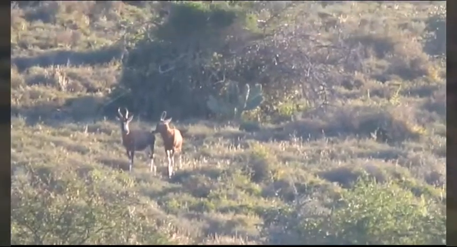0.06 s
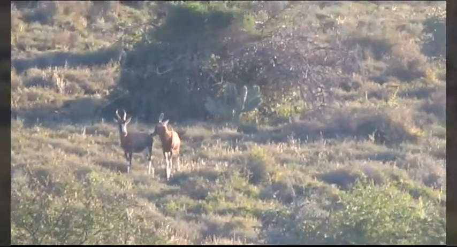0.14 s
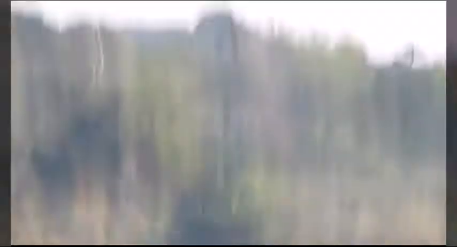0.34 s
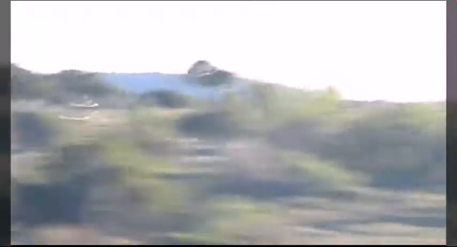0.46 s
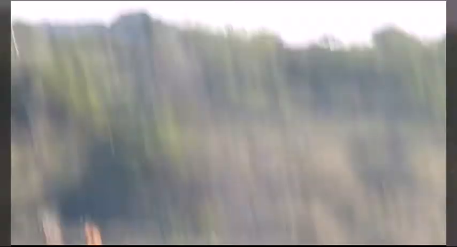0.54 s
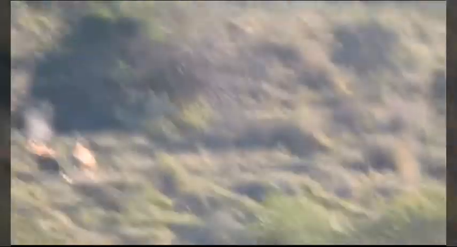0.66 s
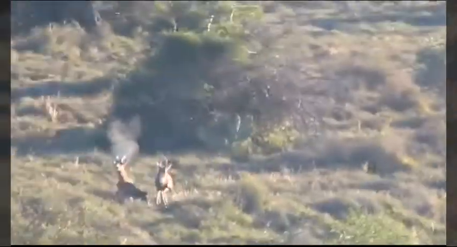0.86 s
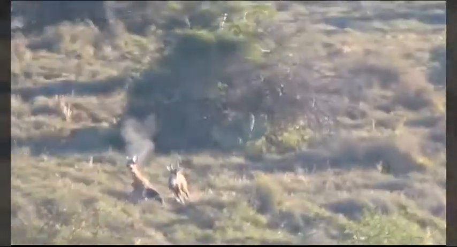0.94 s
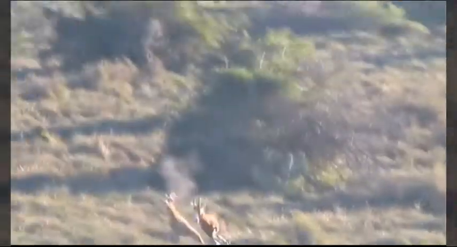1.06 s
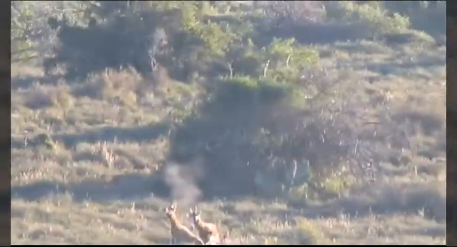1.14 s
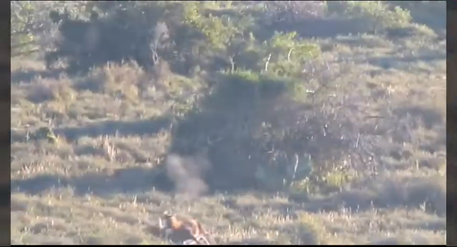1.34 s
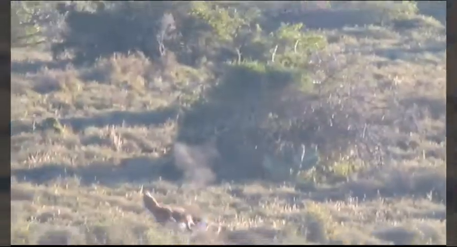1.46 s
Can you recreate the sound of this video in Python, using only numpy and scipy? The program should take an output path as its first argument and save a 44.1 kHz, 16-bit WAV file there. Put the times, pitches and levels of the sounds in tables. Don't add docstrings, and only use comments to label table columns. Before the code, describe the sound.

A close rifle shot cracks and rolls across open scrub, then a distant bullet thud lands

```python
import sys
import numpy as np
from scipy import signal
from scipy.fft import rfft, irfft, next_fast_len
from scipy.io import wavfile
from scipy.ndimage import uniform_filter1d, map_coordinates

SR = 44100
rng = np.random.default_rng(int(sys.argv[2]) if len(sys.argv) > 2 else 0)


def undo_db(level):
    steps = np.asarray(level, float) / 20
    return 10 ** steps


def put_to_file(sound):
    columns = np.atleast_2d(sound).T
    safe = np.clip(columns, -1, 1)
    whole_steps = np.round(safe * 32767)
    wavfile.write(sys.argv[1], SR, whole_steps.astype(np.int16))


N = 66150

SHOT_S = 0.2447
HOLD_S = 0.036
MIDDLE_S = 0.62


def unit(x):
    return x / np.sqrt(np.mean(x ** 2) + 1e-20)


def along(points, hz):
    point_hz, value = np.transpose(points)
    return np.interp(np.log(hz + 1), np.log(point_hz + 1), value)


def since(start_s):
    return np.arange(N) / SR - start_s


def wobble(rate_hz):
    knots = rng.standard_normal(int(N * rate_hz / SR) + 4)
    return map_coordinates(knots, [np.arange(N) * rate_hz / SR])


def filtered(x, response):
    size = next_fast_len(N + SR // 2)
    spectrum = rfft(x, size) * response(np.fft.rfftfreq(size, 1 / SR))
    return irfft(spectrum, size)[..., :N]


def rush(spectrum, alike):
    def response(hz):
        turn = np.arccos(np.clip(along(alike, hz), -1, 1)) / 2
        return undo_db(along(spectrum, hz)) * [np.cos(turn), np.sin(turn)]
    mid, side = filtered(rng.standard_normal((2, N)), response)
    return unit(np.array([mid + side, mid - side]))


def moving(x, gain_db, size=256):
    hz, t, z = signal.stft(x, SR, nperseg=size)
    z = z * undo_db(gain_db(hz[:, None], t))
    return signal.istft(z, SR, nperseg=size)[1][:, :N]


def sides(pan_db):
    return undo_db(np.array([pan_db / 2, -pan_db / 2]))


# (frequency [Hz], density [dB/Hz])
WIND_COLOUR = [(20, -8), (90, -2.5), (290, -14), (800, -12.5), (1150, -13.5), (1400, -23.5), (8500, -30.5),
               (15300, -40), (15900, -120)]
# (frequency [Hz], depth [dB])
DUCK_DEPTH = [(40, 19.5), (500, 22.5), (3000, 28), (12000, 43)]
# (frequency [Hz], time [s])
DUCK_RECOVERY = [(40, .6), (300, 1), (3000, 1.2)]
# (frequency [Hz], share [1])
GUST_SHARE = [(60, 1), (300, 0.33), (1500, 0.064)]


def wind():
    level_db, gust_depth_db = -52, 3.5
    gust_db = gust_depth_db * wobble(25)

    def level(hz, s):
        duck = (s > SHOT_S) * np.exp(-((s - SHOT_S) / along(DUCK_RECOVERY, hz)) ** 2)
        gust = along(GUST_SHARE, hz) * np.interp(s, since(0), gust_db)
        return level_db - along(DUCK_DEPTH, hz) * duck + gust
    return moving(rush(WIND_COLOUR, [(100, 0.25), (4000, 0)]), level, size=512)


# (frequency [Hz], density [dB/Hz])
HAZE_COLOUR = [(800, -40.5), (2500, -6), (5000, -5), (8000, -6.5), (12000, -7.5), (16000, -16)]


def haze():
    early_db, early_t60_s = -36.5, 0.81
    late_db, late_t60_s = -51, 6.3
    air_db_per_khz_s = 0.6
    t = since(SHOT_S)

    def air(hz, s):
        return -air_db_per_khz_s * (hz / 1000 - 7) * (s - MIDDLE_S)
    hiss = moving(rush(HAZE_COLOUR, [(1000, 0.7), (8000, 0.25)]), air)
    early = undo_db(early_db - 60 * t / early_t60_s)
    late = undo_db(late_db - 60 * t / late_t60_s)
    return (t > 0) * hiss * (early + late)


# (frequency [Hz], density [dB/Hz])
ROLL_COLOUR = [(25, -37.5), (60, -22.5), (110, -3), (200, 2.5), (420, -9), (660, -20), (1000, -23.5),
               (2000, -90.5)]
# (frequency [Hz], T60 [s])
ROLL_DECAY = [(60, 0.27), (250, 0.92), (550, 1), (1000, .45)]
# (frequency [Hz], left-right likeness [1])
FAR_LIKENESS = [(60, 1), (240, 0.94), (940, 0.9), (3740, 0.67), (14800, 0.21)]


def roll():
    early_db, late_db, late_t60_s = -41.5, -51.5, 8.4
    t = since(SHOT_S)

    def fade(hz, s):
        return early_db - 60 * (s - SHOT_S - HOLD_S).clip(0) / along(ROLL_DECAY, hz)
    early = moving(rush(ROLL_COLOUR, FAR_LIKENESS), fade, size=1024)
    late_gain = undo_db(late_db - 60 * t / late_t60_s + 2.23 * wobble(30))
    late = rush(ROLL_COLOUR, FAR_LIKENESS) * late_gain
    return (t > 0) * (early + late)


# (time [s], level [dB])
SCRUB_DENSITY = [(.3, -33), (.4, -42), (.49, -43), (.503, -52), (.534, -48.5), (.545, -37), (.6, -44.5),
                 (.7, -45), (.725, -39.5), (.93, -38), (.95, -39), (1.06, -39.5), (1.11, -34.5),
                 (1.192, -38), (1.205, -41.5), (1.35, -44.5), (1.378, -47.5), (1.42, -47.5)]
# (time [s], level [dB])
ROCK_FACES = [
    (.547, -31),
    (.753, -35.5),
    (.797, -32),
    (1.0248, -30),
    (1.098, -32),
    (1.1564, -31.5),
    (1.439, -37),
    (1.4764, -39),
]
# (time [s], peak level [dB], brightness [dB/octave], depth [s])
SINGLE_BUSHES = [(0.2966, -1.5, 3, 0.0034), (0.3298, -5, 0, 0.0033), (0.3551, -15, -3, 0.0048),
                 (0.381, -19, -2, 0.0034), (0.4289, -24, -8, 0.003), (0.463, -23, -4, 0.0044),
                 (0.486, -21.5, 4.5, 0.0038), (0.5406, -25, -0.6, 0.004), (0.5694, -28.5, -1.5, 0.008),
                 (0.78, -25.5, 1.6, 0.0097), (0.8394, -29, 1.2, 0.0064), (0.864, -22, 2, 0.0037),
                 (0.9066, -17, 2.5, 0.0056), (0.9722, -21, 0, 0.0043), (1.024, -24, -1.5, 0.0072),
                 (1.0942, -29, 0.5, 0.0035), (1.1174, -23, 2, 0.0025), (1.156, -20.5, 2, 0.0063),
                 (1.1797, -21.5, -1.5, 0.0045), (1.259, -23, -3, 0.0022), (1.295, -28.5, 1.5, 0.0057),
                 (1.3329, -23.5, -2, 0.0041), (1.3956, -31.5, -0.4, 0.0052), (1.4273, -27.5, -1.5, 0.0057)]
# (frequency [Hz], density [dB/Hz])
CRACK_COLOUR = [(200, -39), (1000, -23), (1600, -11), (2900, -1.5), (4800, -4.5), (6500, -12), (8500, -20),
                (16000, -57.5)]


def echoes():
    bush_db, grain_db, clump_db, rock_s = -13.5, 2, 0.2, 0.0011
    air_db_per_s, air_power = 1.75, 1.445
    dip_hz, dip_sink_per_s, dip_order = 1140, 0.13, 1.5
    flight_end_s, dulling_s = 1.165, 0.041
    after_hz, after_db, after_most_db = 3320, 9, 11
    pan_db, pan_db_per_s, left_lag_s = 1.4, -3, 1.5e-5
    t = since(0)

    scrub_db = np.interp(t, *np.transpose(SCRUB_DENSITY)) + clump_db * wobble(45.53)
    power = np.ones((2, 1)) * undo_db(scrub_db) ** 2 * (t > SHOT_S)
    for at_s, level_db in ROCK_FACES:
        power = power + undo_db(level_db) ** 2 * np.exp(-((t - at_s) / rock_s) ** 2)
    tilt_db = np.zeros(N)
    for at_s, level_db, bright_db, depth_s in SINGLE_BUSHES:
        shape = np.exp(-((t - at_s - depth_s) / depth_s) ** 2)
        power = power + undo_db(level_db + bush_db) ** 2 * shape
        tilt_db = tilt_db + np.clip(bright_db, -3, 3) * np.sqrt(shape)

    def colour(hz, s):
        bush = np.interp(s, t, tilt_db) * np.log2((hz + 1) / 3300).clip(-1.5, 1.5)
        after = np.minimum(after_db * np.log2(1 + (hz / after_hz) ** 6), after_most_db)
        after = after * ((s - flight_end_s) / dulling_s).clip(0, 1)
        air = air_db_per_s * (hz / 1000) ** air_power * (s - MIDDLE_S).clip(-0.3)
        edge_hz = dip_hz * np.exp(-dip_sink_per_s * (s - MIDDLE_S))
        ground = 10 * np.log10(1 + (edge_hz / (hz + 1)) ** (2 * dip_order))
        return bush - after - air - ground
    wash = moving(rush(CRACK_COLOUR, FAR_LIKENESS), colour)
    wash = wash / np.sqrt(np.abs(uniform_filter1d(np.mean(wash ** 2, axis=0), size=441)))
    wash = wash * np.sqrt(power) * undo_db(grain_db * wobble(300))
    wash = wash * sides(pan_db + pan_db_per_s * (t - MIDDLE_S))
    ears = np.array([[1], [-1]])
    return filtered(wash, lambda hz: np.exp(-1j * np.pi * hz * left_lag_s * ears))


# (frequency [Hz], level [dB], T60 [s])
SLAP_MODES = [
    (1710, -14.5, 0.0069),
    (1430, -19.5, .008),
    (990, -24.5, 0.0089),
    (4300, -28, 0.0037),
    (317, -30.5, .03),
]
# (frequency [Hz], density [dB/Hz])
RATTLE_COLOUR = [(40, -34), (80, 6), (200, 1.5), (400, -8), (900, -30)]


def thud():
    strike_s, slap_rise_s = 1.1597, 0.00018
    body_db, body_hz, body_peak_s, body_wide_s, body_lead_s = -16, 155.5, 0.0041, 0.0027, 0.0013
    rattle_db, rattle_t60_s = -33, 0.085
    t = since(strike_s)
    age = t.clip(0)
    slap = 0
    for hz, level_db, t60_s in SLAP_MODES:
        slap = slap - undo_db(level_db - 60 * age / t60_s) * np.sin(2 * np.pi * hz * age)
    heave = undo_db(body_db) * np.exp(-0.5 * ((t - body_peak_s) / body_wide_s) ** 2)
    swing = -np.sin(2 * np.pi * body_hz * (age + body_lead_s)) * heave
    shake = rush(RATTLE_COLOUR, FAR_LIKENESS) * undo_db(rattle_db - 60 * age / rattle_t60_s)
    shake = shake * (1 - np.exp(-age / body_peak_s))
    onset = 1 - np.exp(-(age / slap_rise_s) ** 2)
    return (slap + swing) * onset + shake


def boom():
    start_s, level_db, heave_hz, t60_s, pan_db = 0.2535, -15.5, 62, 0.05, 11
    t = since(start_s).clip(0)
    heave = undo_db(level_db - 60 * t / t60_s) * np.sin(2 * np.pi * heave_hz * t)
    return sides(pan_db)[:, None] * heave


# (frequency [Hz], density [dB/Hz])
NEAR_COLOUR = [(59, -20.5), (100, -18.5), (573, -3), (738, -0.5), (1450, -5.5), (2300, -2.5), (3020, -7),
               (5800, -2), (15300, -13.5)]
# (frequency [Hz], T60 [s])
NEAR_DECAY = [(300, 0.48), (1000, 0.18), (4000, 0.25), (12000, 0.16)]
# (frequency [Hz], left-right likeness [1])
NEAR_LIKENESS = [(100, .2), (600, .5), (2000, 0), (10000, -.05)]


def blast():
    push_db, push_s, suck_s = -6, 0.0003, 0.0009
    jet_db, jet_t60_s = -3, 0.012
    lead_s, lead_db = 0.0059, 31
    near_db, sag_db = -8.5, 3.5
    t = since(SHOT_S)

    def bell(at_s):
        return np.exp(-0.5 * ((t - at_s) / push_s) ** 2)
    pulse = undo_db(push_db) * (0.52 * bell(push_s) - bell(push_s + suck_s))
    lead = (t > -lead_s) * undo_db(-3 + lead_db * np.minimum(t, 0) / lead_s)
    gate = np.where(t < 0, lead, 1)
    jet_gain = undo_db(jet_db - 60 * np.abs(t - 0.002).clip(0.001) / jet_t60_s)
    jet = (t > 0) * jet_gain * rush(NEAR_COLOUR, NEAR_LIKENESS)

    def fade(hz, s):
        return -60 * (s - SHOT_S - HOLD_S).clip(0) / along(NEAR_DECAY, hz)
    near = moving(rush(NEAR_COLOUR, NEAR_LIKENESS), fade)
    near = near * undo_db(near_db - sag_db * t.clip(0, HOLD_S) / HOLD_S + 1.4 * wobble(250))
    return pulse + gate * near + jet


def ceiling(hz, s):
    top_hz, early_hz, early_s, sink_hz_per_s, ragged_hz = 11400, 4400, 0.16, 3300, 150
    age = (s - SHOT_S).clip(0)
    edge_hz = top_hz + early_hz * np.exp(-age / early_s) - sink_hz_per_s * age
    edge_hz = edge_hz + ragged_hz * np.round(np.interp(s, since(0), wobble(20)))
    return -60 * ((hz - edge_hz) / 200).clip(0, 1)


def scene():
    report = moving(haze() + echoes() + thud() + blast(), ceiling)
    return wind() + roll() + boom() + report


def band_limit(x):
    return signal.sosfilt(signal.butter(12, 15420, fs=SR, output="sos"), x)


def record(dry):
    clip_hardness, top_hz = 12, 15400
    clipped = dry / (1 + np.abs(dry) ** clip_hardness) ** (1 / clip_hardness)
    mix = filtered(clipped, lambda hz: 1 / (1 + (hz / top_hz) ** 60))
    return band_limit(mix)


dry = scene()
out = record(dry)
put_to_file(out)
```